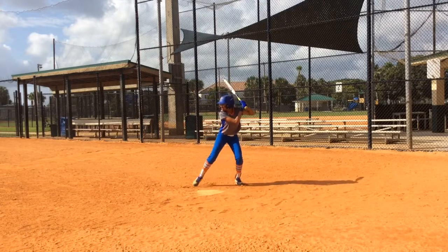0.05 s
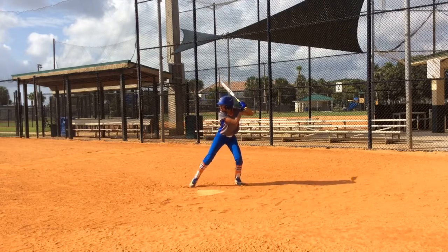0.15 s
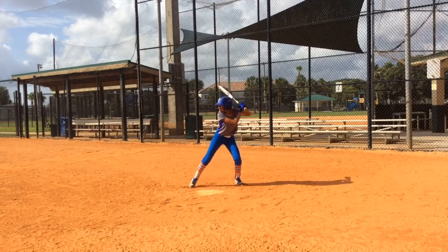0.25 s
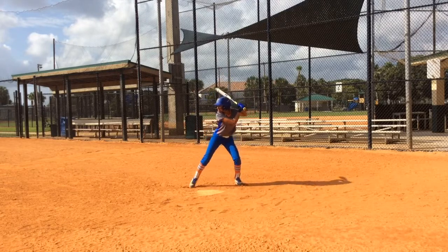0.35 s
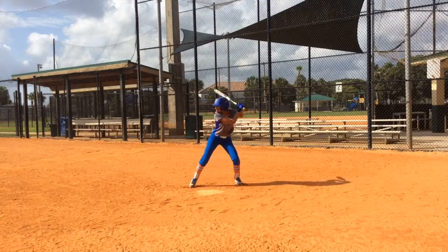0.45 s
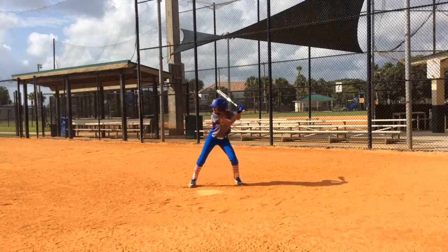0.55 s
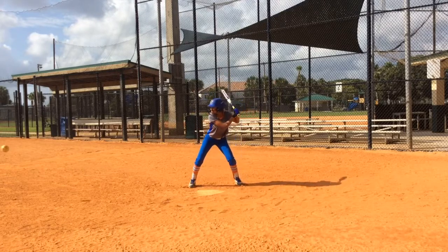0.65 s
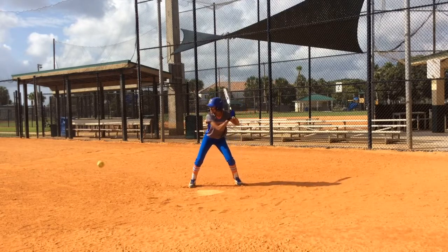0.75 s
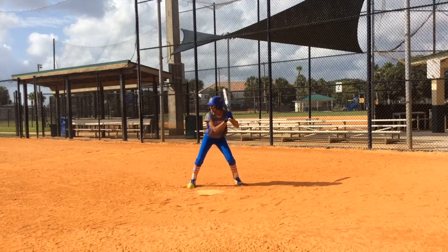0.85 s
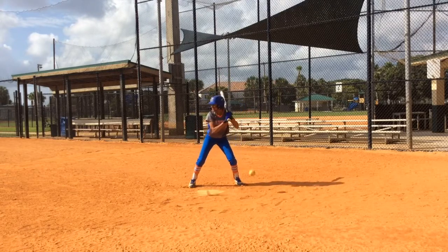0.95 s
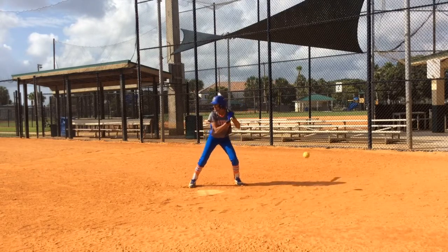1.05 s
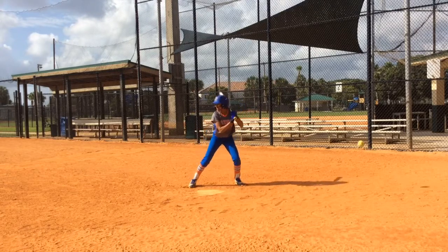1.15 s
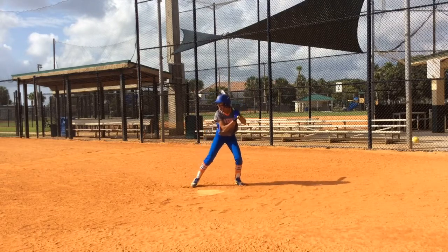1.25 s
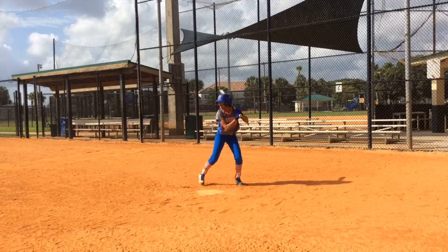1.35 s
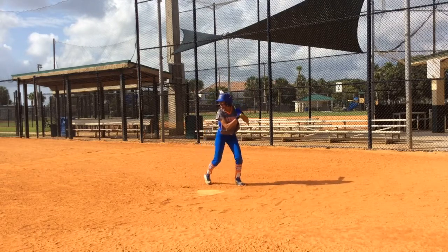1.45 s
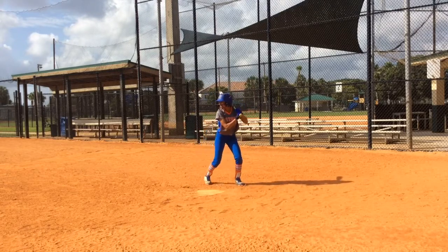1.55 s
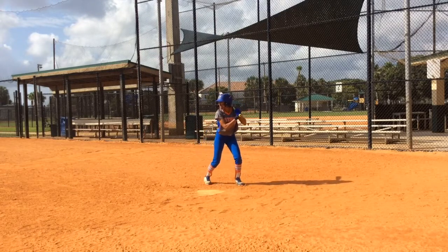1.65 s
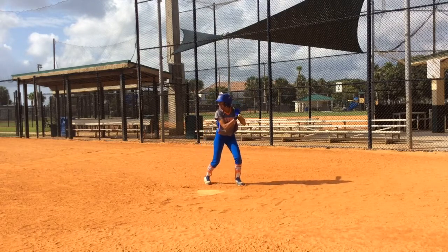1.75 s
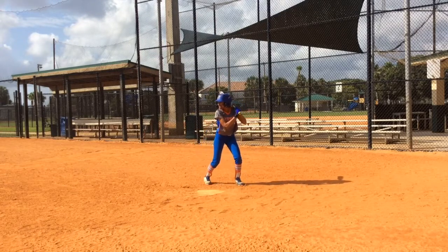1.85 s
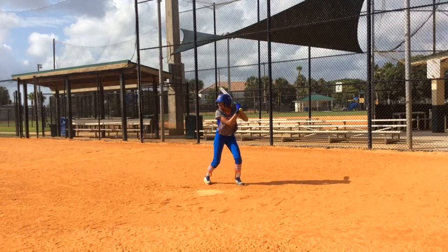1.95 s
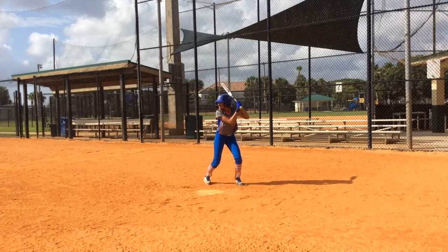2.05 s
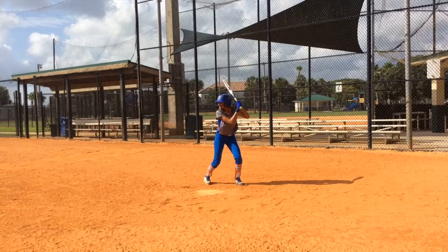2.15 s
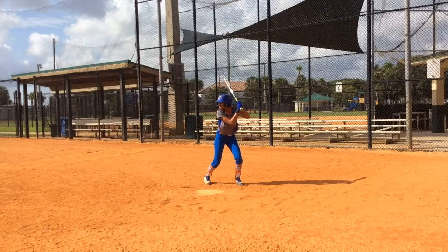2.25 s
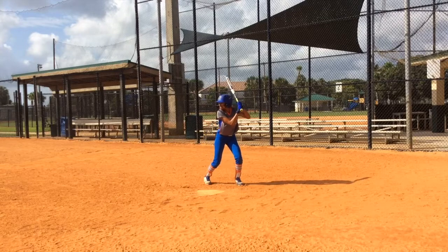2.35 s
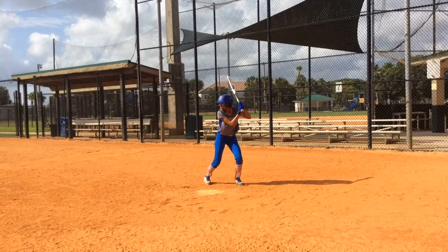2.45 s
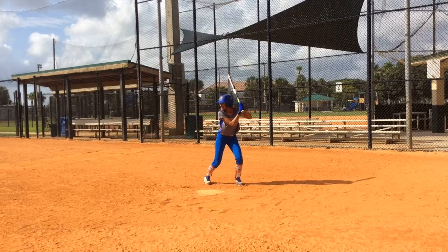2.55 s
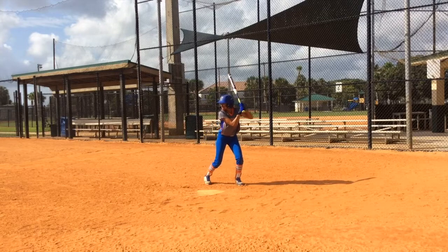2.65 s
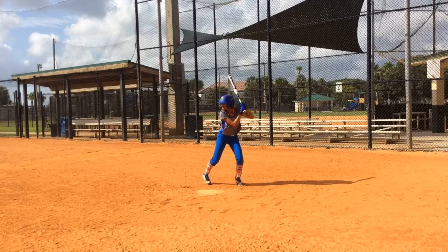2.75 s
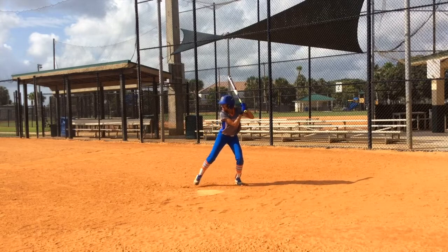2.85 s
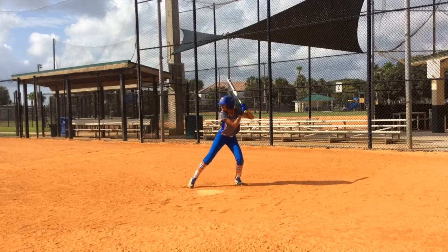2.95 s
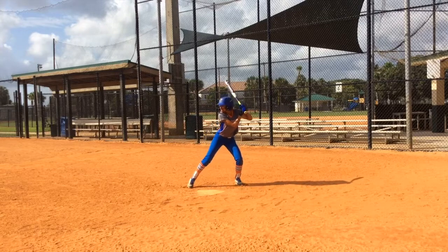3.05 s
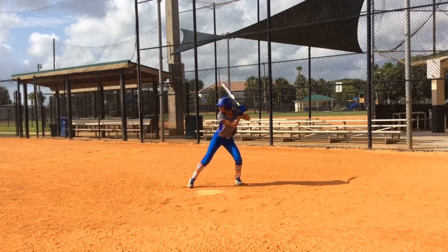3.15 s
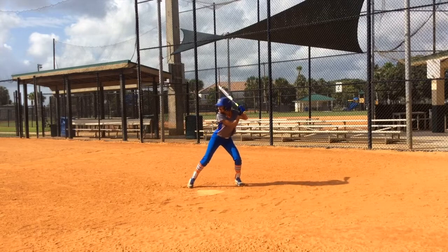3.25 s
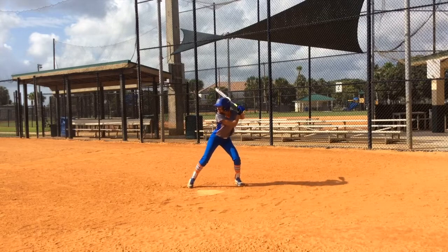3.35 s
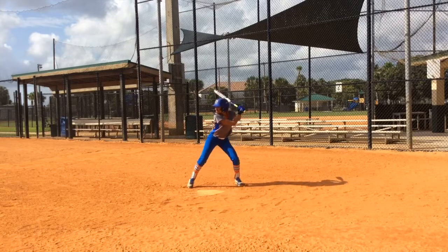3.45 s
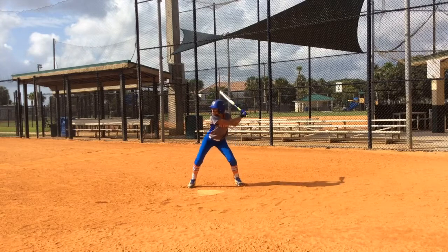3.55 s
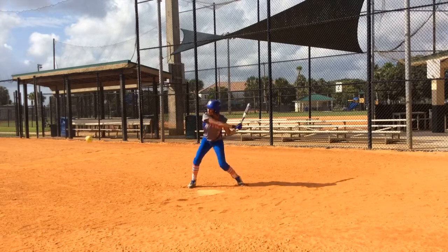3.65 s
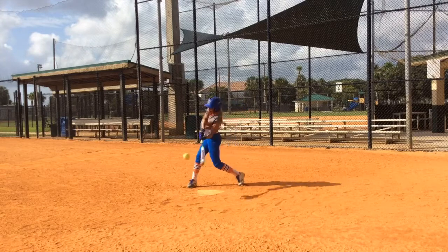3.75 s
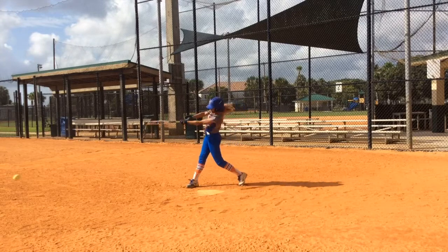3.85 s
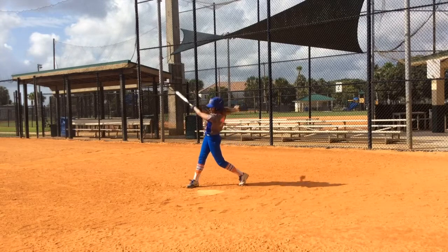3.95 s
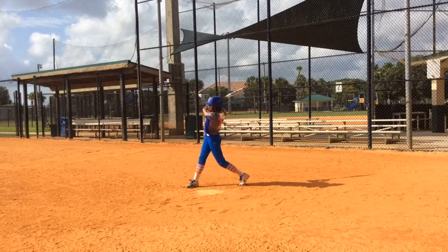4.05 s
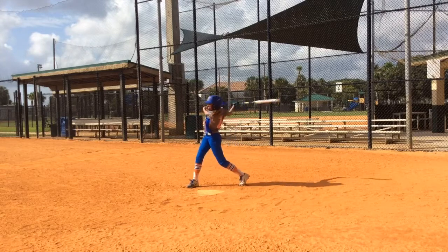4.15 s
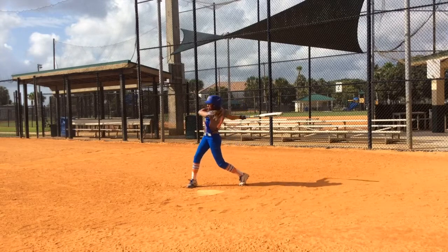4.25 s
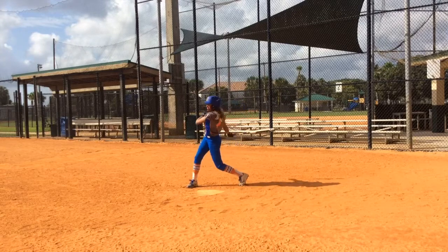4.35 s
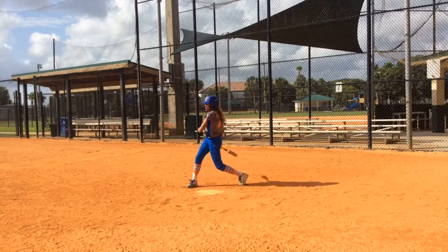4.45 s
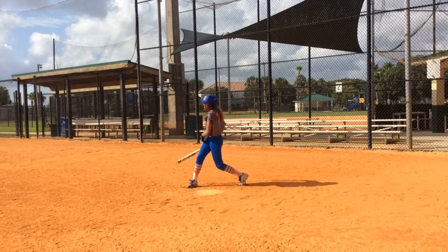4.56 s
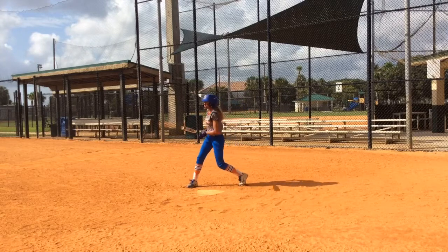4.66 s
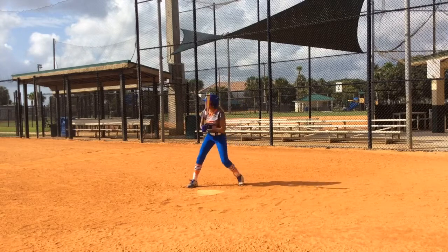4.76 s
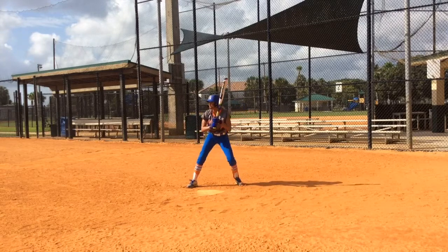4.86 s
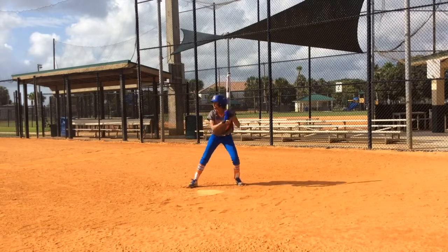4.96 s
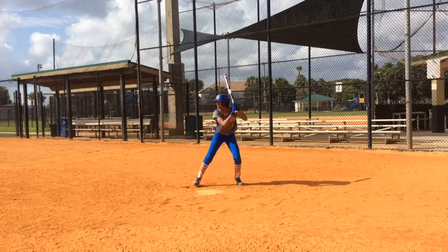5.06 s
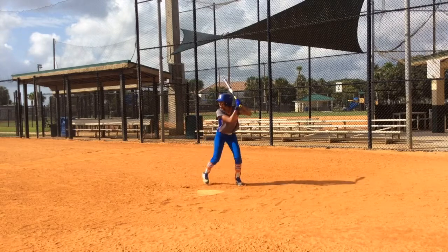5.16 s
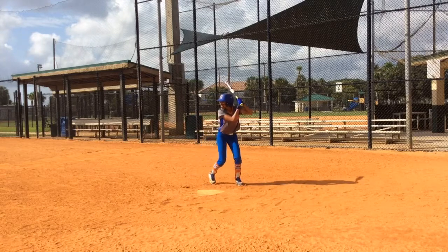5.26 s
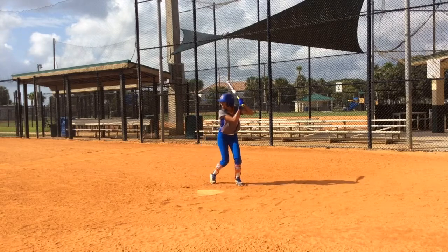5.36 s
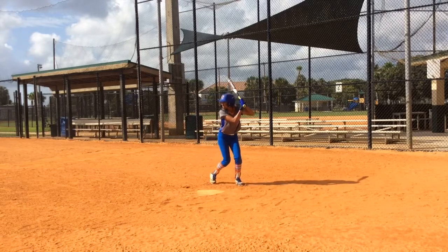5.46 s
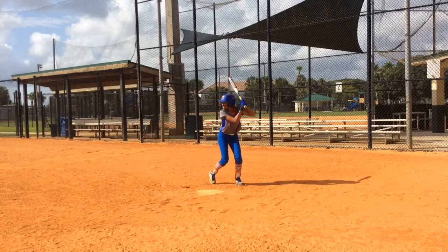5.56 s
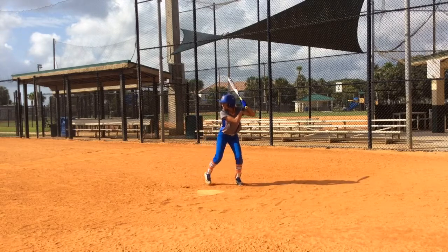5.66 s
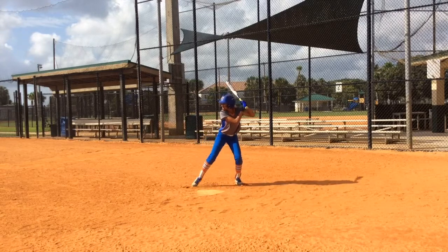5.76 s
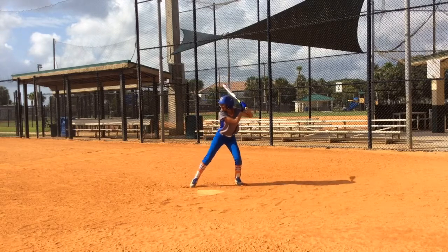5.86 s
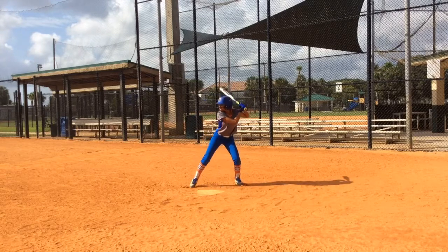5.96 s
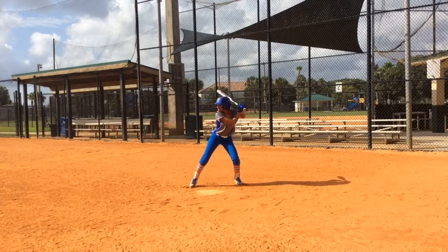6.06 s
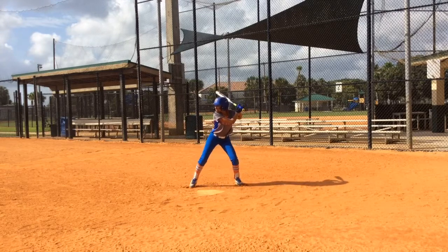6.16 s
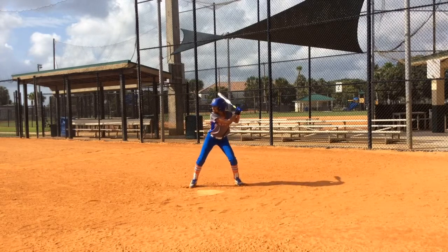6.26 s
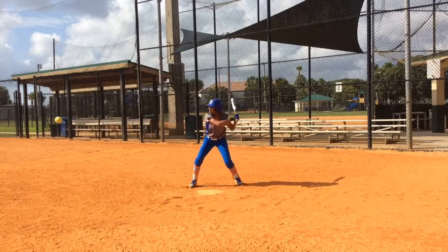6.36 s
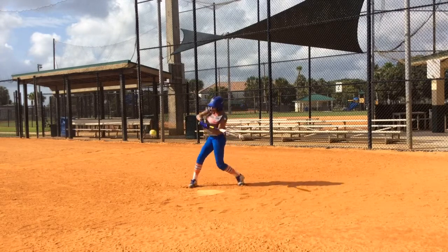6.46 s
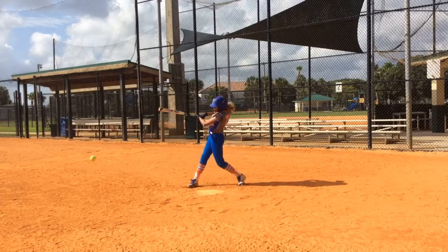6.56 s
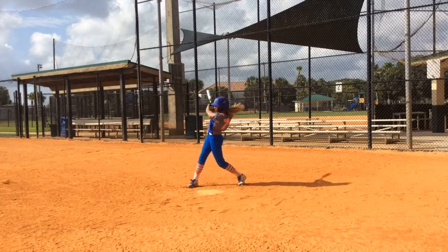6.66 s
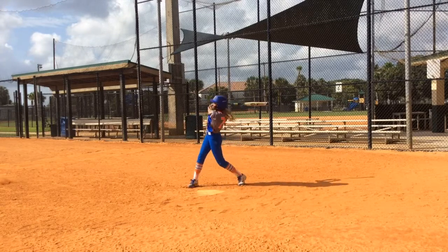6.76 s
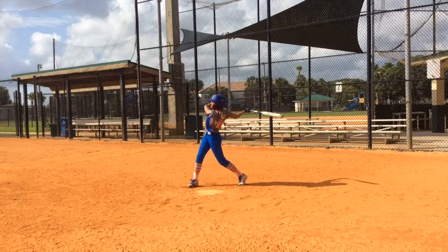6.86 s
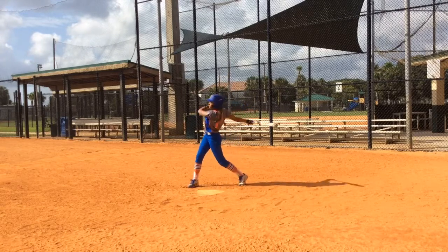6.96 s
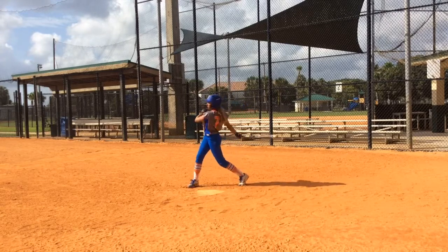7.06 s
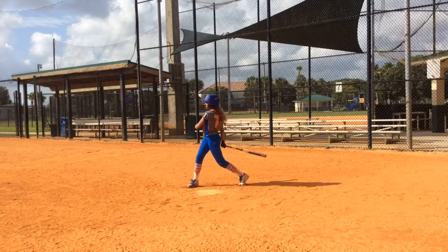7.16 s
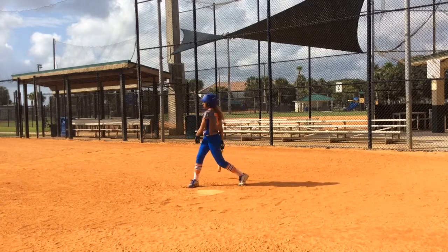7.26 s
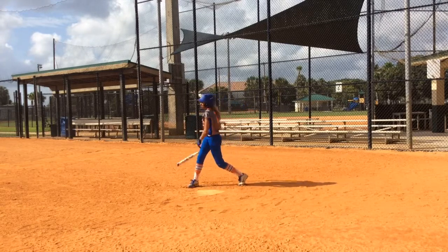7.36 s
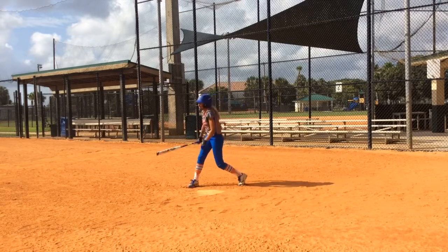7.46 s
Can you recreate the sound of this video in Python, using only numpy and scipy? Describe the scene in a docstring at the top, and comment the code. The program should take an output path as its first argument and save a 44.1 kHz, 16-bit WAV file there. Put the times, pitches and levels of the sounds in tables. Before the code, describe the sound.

Over quiet open air, a ball bounces in dirt and slaps the backstop, followed by two loud metallic bat hits with clattering echoes and landing thuds.

```python
"""A hollow bat hits two balls on a dirt softball field: click, dying modes and a pop, echoed by dugouts,
fences and a diffuse field. Balls land with a thud and grit; one pitch bounces past into the backstop.
Filtered noise makes the swings, cleat scuffs, open air and insects; wavering sines make a far engine,
traffic drone and cricket. One microphone, alike in both ears."""
import sys
import numpy as np
from scipy import signal
from scipy.fft import rfft, irfft
from scipy.io import wavfile

SR = 44100
rng = np.random.default_rng(int(sys.argv[2]) if len(sys.argv) > 2 else 0)


def digitize_waveform(pressure):
    """Quantize a signal to 16-bit integers and store it at the path in sys.argv[1].

    Rows of a 2-D input are taken as channels; values are limited to [-1, 1].
    """
    field = np.atleast_2d(pressure).T
    bounded = np.clip(field, -1, 1)
    quanta = np.round(bounded * 32767).astype(np.int16)
    wavfile.write(sys.argv[1], SR, quanta)


N = 331568
T = np.arange(N) / SR
RING_T = np.arange(SR) / SR

# Open-air noise spectrum: (frequency [Hz], relative level [dB])
AIR_SPECTRUM = [(15, -36), (25, -15), (77, -3), (135, -3.5), (167, -7.5), (224, -8.5), (301, -18),
                (394, -18), (529, -28), (952, -25.5), (1720, -36), (4040, -47), (5420, -49.5),
                (8550, -45.5), (15000, -58)]
# High hiss of insects: (centre [Hz], half-width [Hz], level [dB])
INSECT_BAND = (8800, 770, -94.5)
# Far engine: (time [s], pitch [Hz], level [dB])
ENGINE_TRACK = [(0, 110, -73.5), (.72, 112, -62.5), (1.1, 124, -68.5), (1.7, 135.4, -63),
                (3.1, 154.2, -74.5), (4.4, 132.8, -71.5), (5.4, 138.1, -70), (6.5, 143.1, -63),
                (7.5, 147.1, -56.5)]
# Deeper traffic drone: (time [s], pitch [Hz], level [dB])
DRONE_TRACK = [(0, 76.1, -78), (1.2, 79.1, -66), (3.2, 92.44, -74.5), (4.9, 84.2, -75.5),
               (5.9, 88.2, -66.5), (7.5, 90, -65)]

# Cleat scuffs: (time [s], energy [dB], length [s], pitch [Hz])
SCUFF_EVENTS = [(4.981, -50.5, 0.073, 1760), (5.114, -41, .11, 540), (5.42, -44.5, 0.25, 2360),
                (6.011, -42.5, 0.065, 980), (7.4, -51, 0.035, 1505)]
# Dirt spectrum: (multiple of the scuff pitch, level [dB])
DIRT_SPECTRUM = [(.15, -27), (.6, 7.5), (1, 5.5), (1.5, -0.5), (3, -6.5), (6, -17), (11, -18), (16, -38)]
# Bat through the air: (time of the peak [s], half-length to 1/e [s], pitch [Hz], peak level [dB])
SWING_EVENTS = [(3.663, 0.25, 409, -72.5), (6.582, 0.053, 450, -80.5)]
# Whoosh spectrum: (multiple of the swing pitch, level [dB])
WHOOSH_SPECTRUM = [(.3, -34), (.8, -17), (1, 4.5), (1.2, -13), (1.42, -13), (1.62, -4.5), (1.9, -27),
                   (6, -42.5)]

# Ball into the backstop: (time [s], energy [dB])
BACKSTOP_HIT = (1.8834, -9.5)
# Slap on the backstop: (frequency [Hz], level [dB])
SLAP_SPECTRUM = [(20, -18), (45, 9), (80, 1), (200, 17.5), (290, -0.5), (600, 2.5), (1100, -2), (2000, -12),
                 (2900, -22), (4600, -12), (6000, -27), (8000, -34), (15000, -40)]
# Backstop modes: (frequency [Hz], level [dB], t60 [s])
BACKSTOP_MODES = [(85, -1.5, 0.15), (113.4, -5, 0.18), (199.6, -6, 0.091)]
# Rebound and echoes of the backstop: (frequency [Hz], level [dB])
BACKSTOP_TAIL_SPECTRUM = [(25, -14), (60, -8.5), (115, 9), (220, 4), (450, -8.5), (800, -7), (1500, -9),
                          (2300, -20.5), (4000, -28), (6000, -55), (15000, -74)]

# Ball on dirt: (time [s], thud energy [dB], thud pitch [Hz], grit re thud [dB], echo re thud [dB])
BOUNCE_EVENTS = [(1.0413, -14.7, 283.7, -21.5, -6.5), (1.7690, -26, 306, -30.5, -19),
                 (1.7750, -28.5, 276, -35, -14), (2.4698, -30, 374, -27, -11), (2.771, -44, 403, -20, -13),
                 (4.0872, -24, 385.7, -11, -10.5), (4.710, -38.5, 440, -17, -12),
                 (6.174, -50.5, 440, -7, -10), (6.8065, -20, 337.6, -12, -8)]
# Thud: (multiple of the thud pitch, level [dB])
THUD_SPECTRUM = [(.1, -31), (.4, 0), (1, 0.5), (1.5, -4), (2.1, -13), (3.1, -9.5), (5.5, -33.5), (12, -45),
                 (30, -75)]
# Grit: (multiple of the grit pitch, level [dB])
GRIT_SPECTRUM = [(.1, -41), (.65, -3), (1, 7.5), (1.25, 4), (1.7, -21), (4, -62)]
# Hard cover of the ball: (frequency [Hz], level [dB])
COVER_SPECTRUM = [(200, -18), (500, -6.5), (660, -5), (780, -9), (900, -0.5), (1100, -6.5), (1300, -9),
                  (1700, -29), (4000, -56), (15000, -80)]
# Colour of the answer to a bounce: (frequency [Hz], level [dB])
WALL_SPECTRUM = [(100, -2.5), (1200, 1), (2500, -3.5), (6000, -11), (15000, -27)]

# Dugouts, posts and fences round the plate; each favours one bat mode: (delay [s], level [dB],
# smear [s], tilt [dB per octave], favoured mode [Hz], share of that mode [dB])
WALL_ECHOES = [(.0042, -7, .005, 3.5, 849, -5), (0.0159, -9, .012, -1, 4334, -7.5),
               (0.0265, -0.5, .0036, -.5, 3284, -12), (0.0415, -9, .006, -2, 1162, 2.5),
               (0.0594, -7.5, .009, 0, 1278, -2), (.0741, -6.5, 0.0025, 0.8, 4340, -10),
               (0.0897, -15.5, .0042, 2.5, 4300, 4), (.106, -24, .002, -2, 2840, -14)]
# Diffuse decay of the field: (frequency [Hz], t60 [s])
FIELD_T60 = [(100, 0.67), (400, 0.32), (1100, 0.41), (2500, 0.39), (4400, 0.4), (8000, 0.4), (15000, 0.31)]
# Return of the outfield fence and the trees behind it: (frequency [Hz], level [dB])
OUTFIELD_SPECTRUM = [(500, -30), (1200, 9), (1700, -7.5), (2350, 7), (3300, 2), (3900, -4), (4350, 2),
                     (4550, 10), (4850, -6.5), (8000, -8.5), (12000, -15), (15000, -37)]

# Blows of the bat: (time [s], crack energy [dB], barrel pop energy [dB], pop pitch [Hz],
# thock energy [dB], thock pitch [Hz], diffuse tail energy [dB], echo level [dB],
# echo brightness [dB per octave])
BAT_HITS = [(3.9236, -10, -8, 1108, -15.5, 440, -6, -5.5, -0.9),
            (6.6534, -7, -6.5, 1047, -14.5, 318.6, -5, -2.5, 1.3)]
# Crack of contact: (frequency [Hz], level [dB])
CRACK_SPECTRUM = [(25, -25), (70, -9.5), (150, -4), (400, 8.5), (650, 3.5), (1200, 1), (1750, -11.5),
                  (2400, 5), (4600, 4), (5600, -5.5), (8000, -5), (15000, -11)]
# Bat modes: (frequency [Hz], level in first blow [dB], level in second blow [dB], t60 [s])
BAT_MODES = [(1129, 4.5, -8.5, 0.19), (1281, -5.5, -0.5, 0.25), (1520, -19, -14.5, .06),
             (2034, -14, -7.5, .07), (2100, -16, -12.5, .06), (2260, -23, -10, 0.045),
             (2636, -18, -25, 0.044), (2880, -12, -9.5, 0.091), (3288, -12, -8, 0.12),
             (4350, -14, -5.5, 0.13), (4900, -25, -34, .05), (6090, -26.5, -22.5, .06),
             (6150, -32, -19, .06), (6930, -25, -24, .05)]
# Crack as the barrel throws it sideways: (frequency [Hz], level [dB])
THROWN_SPECTRUM = [(60, -32), (400, -15.5), (620, -3.5), (820, -6), (1130, 15), (1430, 2.5), (2000, 3),
                   (2450, -1), (2950, 3), (3800, -5), (5500, -7.5), (8000, -11.5), (10000, -10.5),
                   (15000, -18)]

AIR_DB = -65.3
CRICKET_HZ, CRICKET_DB, CRICKET_SWELL_DB = 3933, -101.5, 2.6

REBOUND_S, REBOUND_DB = 0.015, -24  # the covering slaps back
# the walls' answer to the backstop, which stands a little further from them
BACKSTOP_WALL_DB, BACKSTOP_LAG_S, BACKSTOP_SMEAR_S = -14.5, 0.0028, 0.0029

HARD_LANDING_DB = -23  # thud energy below which it dulls
HARDNESS_DB_PER_OCT, SOFTENING_DB_PER_OCT_PER_DB = -2, 0.9  # thud tilt; its loss per dB of energy
GRIT_RATIO = 9.5  # grit pitch over thud pitch
BOUNCE_WALL_DB, BOUNCE_LEAD_S = -3.5, 0.0012  # a bounce lands a little nearer to the walls
BOUNCE_NEAR_S, BOUNCE_NEAR_DB = 0.0065, 1  # return from close by
BOUNCE_SMEAR_S = 0.0025
WALL_MIRROR_DB = -4.5  # mirror-like share of a wall's return of a thud

BEAM_T60_S, ECHO_RING_DB = 0.063, -7  # ring of the favoured mode; share of the whole barrel
HOOP_HZ, HOOP_DB, HOOP_DECAY_S = 4347, -34.5, 0.13  # high hoop mode lingering among far buildings
OUTFIELD_DELAY_S = 0.362  # to the outfield fence and back

LOW_CUT_HZ, EDGE_HZ = 42, 15400  # microphone's bass roll-off; recorder's band limit


def gain_of(db):
    """Decibels to amplitude."""
    return 10 ** (np.asarray(db) / 20)


def unit(x):
    """Scales to energy 1."""
    return x / np.sqrt(np.sum(x ** 2) + 1e-30)


def evened(x):
    """Scales to rms 1."""
    return unit(x) * np.sqrt(x.size)


def read(points, hz):
    """Joins the points of a spectrum on a log-frequency axis."""
    point_hz, value = np.transpose(points)
    return np.interp(np.log(hz + 1e-6), np.log(point_hz), value)


def add(mix, start_s, sound):
    """Mixes a sound in at start_s."""
    part = mix[round(start_s * SR):][:len(sound)]
    part += sound[:len(part)]


def bins(x):
    """Frequencies of the spectrum of x [Hz]."""
    return np.fft.rfftfreq(len(x), 1 / SR)


def click(points, tilt_db=0, scale=1, knee_hz=1000):
    """Minimum-phase pulse of energy 1 with this spectrum, tilted in dB per octave above the knee."""
    hz = bins(RING_T)
    octaves = np.log2(np.maximum(hz / knee_hz, 1))
    db = read(points, hz / scale) + tilt_db * octaves
    cepstrum = irfft(np.log(gain_of(db)), SR)
    # folding the cepstrum onto positive time makes the pulse causal
    folded = 2 * cepstrum * (RING_T < 0.5) * (RING_T > 0)
    return unit(irfft(np.exp(rfft(folded)), SR))


def through(x, response):
    """Convolution that keeps the length of x."""
    return signal.fftconvolve(x, response)[:len(x)]


def ring(modes):
    """Dying sines of joint energy 1 from rows (frequency [Hz], level [dB], t60 [s])."""
    total = np.zeros(SR)
    for hz, db, t60_s in modes:
        decay = np.exp(-np.log(1000) * RING_T / t60_s)
        total += gain_of(db) * decay * np.sin(2 * np.pi * hz * RING_T)
    return unit(total)


def scatter(decay_s):
    """Cluster of small reflections: noise decaying by 1/e in decay_s."""
    return unit(rng.standard_normal(SR) * np.exp(-RING_T / decay_s))


def shaped_noise(gain):
    """Noise of rms 1 with this amplitude spectrum."""
    return evened(irfft(rfft(rng.standard_normal(N)) * gain, N))


def wander(rate_hz):
    """Slow random curve of rms 1."""
    return shaped_noise(1 / (1 + (bins(T) / rate_hz) ** 2))


def air():
    """Breeze and traffic as a noise wash, plus a high insect band; both levels drift."""
    hz = bins(T)
    wash = shaped_noise(gain_of(read(AIR_SPECTRUM, hz)))
    centre_hz, width_hz, insect_db = INSECT_BAND
    insects = shaped_noise(1 / (1 + ((hz - centre_hz) / width_hz) ** 2))
    wash_gain = gain_of(AIR_DB + 1.5 * wander(1.5))
    return wash * wash_gain + insects * gain_of(insect_db + 0.6 * wander(0.99))


def hum(track, waver, flutter_db):
    """Far sine that wavers in pitch and level on its way through the air."""
    time_s, hz, db = np.transpose(track)
    pitch_hz = np.interp(T, time_s, hz) * (1 + waver * wander(6))
    turns = np.cumsum(pitch_hz) / SR
    level_db = np.interp(T, time_s, db) + flutter_db * wander(16)
    return gain_of(level_db) * evened(np.sin(2 * np.pi * turns))


def engine():
    """Far engine: one tone that speeds up, eases off and draws nearer."""
    return hum(ENGINE_TRACK, waver=0.008, flutter_db=1.77)


def drone():
    """Deeper traffic: one wavering low tone."""
    return hum(DRONE_TRACK, waver=0.015, flutter_db=2.0)


def cricket():
    """Far cricket: one thin tone that slowly swells and fades."""
    tone = hum([(0, CRICKET_HZ, CRICKET_DB)], waver=0.0033, flutter_db=2.0)
    return tone * gain_of(CRICKET_SWELL_DB * wander(0.47))


def scuffs():
    """Grains of dirt of uneven size slide under a shoe: noise under a half-sine stroke."""
    out = np.zeros(N)
    for start_s, db, length_s, hz in SCUFF_EVENTS:
        grains = rng.standard_normal(SR) * gain_of(1.8 * rng.standard_normal(SR))
        stroke = np.sin(np.pi * np.minimum(RING_T / length_s, 1))
        scuff = through(grains * stroke, click(DIRT_SPECTRUM, scale=hz))
        add(out, start_s, gain_of(db) * unit(scuff))
    return out


def swings():
    """Eddies shed by the barrel: pitched noise swelling and fading about the fastest moment."""
    out = np.zeros(N)
    for peak_s, length_s, hz, db in SWING_EVENTS:
        eddies = evened(through(rng.standard_normal(N), click(WHOOSH_SPECTRUM, scale=hz)))
        out += eddies * gain_of(db) * np.exp(-((T - peak_s) / length_s) ** 2)
    return out


def field(delay_s, rise_s):
    """Diffuse return of fences and stands: swells after a delay, decays at a t60 set by frequency."""
    hz, frame_s, frames = signal.stft(rng.standard_normal(SR), SR, nperseg=256)
    decay = np.exp(-np.log(1000) * frame_s / read(FIELD_T60, hz)[:, None])
    tail = signal.istft(frames * decay, SR, nperseg=256)[1][:SR]
    return unit(tail * np.clip((RING_T - delay_s) / rise_s, 0, 1))


def walls(lag_s, smear_s):
    """Walls' return of a thud: from each a mirror image and a cluster of small reflections."""
    out = np.zeros(SR)
    for delay_s, db, *_ in WALL_ECHOES:
        mirror = gain_of(WALL_MIRROR_DB) * (RING_T == 0)
        add(out, max(delay_s + lag_s, 0), gain_of(db) * (scatter(smear_s) + mirror))
    return out


def outfield(barrel, rise_s, decay_s):
    """A long fence answers bit by bit, so its echo swells and fades."""
    envelope = (1 - np.exp(-RING_T / rise_s)) * np.exp(-RING_T / decay_s)
    spread = rng.standard_normal(SR) * envelope
    return unit(through(spread, click(OUTFIELD_SPECTRUM) + gain_of(-8.0) * barrel))


def backstop():
    """Ball on the backstop: a slap, a flapping covering, a low modal boom and dull echoes."""
    out = np.zeros(N)
    hit_s, db = BACKSTOP_HIT
    tail = click(BACKSTOP_TAIL_SPECTRUM)
    add(out, hit_s, -gain_of(db) * click(SLAP_SPECTRUM))
    flap = unit(through(click(SLAP_SPECTRUM, tilt_db=3.1), scatter(0.004)))
    add(out, hit_s, gain_of(db - 7.5) * flap)
    rebound = unit(through(tail, scatter(0.0015)))
    add(out, hit_s + REBOUND_S, gain_of(REBOUND_DB) * rebound)
    add(out, hit_s, gain_of(-8.5) * ring(BACKSTOP_MODES))
    add(out, hit_s, gain_of(-14.0) * unit(through(tail, field(0.002, 0.02))))
    duller = click(BACKSTOP_TAIL_SPECTRUM, tilt_db=-0.3)
    echo = unit(through(duller, walls(BACKSTOP_LAG_S, BACKSTOP_SMEAR_S)))
    add(out, hit_s, gain_of(BACKSTOP_WALL_DB) * echo)
    return out


def bounces():
    """The ball lands with a dull push and a spit of grit, the softer the duller; walls and field answer."""
    out = np.zeros(N)
    around = gain_of(BOUNCE_WALL_DB) * walls(-BOUNCE_LEAD_S, BOUNCE_SMEAR_S)
    around += gain_of(-5) * field(0.0023, 0.0032)
    add(around, BOUNCE_NEAR_S, gain_of(BOUNCE_NEAR_DB) * scatter(0.0027))
    colour, cover = click(WALL_SPECTRUM), click(COVER_SPECTRUM)
    for start_s, db, hz, grit_db, echo_db in BOUNCE_EVENTS:
        softness_db = max(HARD_LANDING_DB - db, 0)
        tilt_db = HARDNESS_DB_PER_OCT - SOFTENING_DB_PER_OCT_PER_DB * softness_db
        grit = unit(through(click(GRIT_SPECTRUM, scale=GRIT_RATIO * hz), scatter(0.002)))
        push = click(THUD_SPECTRUM, tilt_db, hz, knee_hz=1.2 * hz)
        crush = unit(through(push, scatter(0.0021)))  # the soil gives way
        shell = gain_of(-9.5 + 1.28 * tilt_db) * cover  # weaker in a soft landing
        body = unit(push + gain_of(-11) * crush)
        thud = gain_of(db) * (body + shell + gain_of(grit_db) * grit)
        add(out, start_s, thud)
        echo = unit(through(through(thud, colour), around))
        add(out, start_s, gain_of(db + echo_db) * echo)
    return out


def bat_contact(crack_db, pop_db, pop_hz, thock_db, thock_hz):
    """Direct sound of a blow: crack, short barrel pop and the ball's thock."""
    splinter = unit(through(click(CRACK_SPECTRUM, tilt_db=0.3), scatter(0.0038)))
    crack = unit(click(CRACK_SPECTRUM) + gain_of(3.5) * splinter)
    pop = ring([(pop_hz, 0, 0.032)])
    thock = ring([(thock_hz, 0, 0.015)])
    return gain_of(crack_db) * crack + gain_of(pop_db) * pop + gain_of(thock_db) * thock


def bat():
    """Each blow arrives direct; the ringing barrel is heard by way of the surroundings."""
    out = np.zeros(N)
    for blow, (hit_s, *contact, tail_db, echo_db, bright_db) in enumerate(BAT_HITS):
        add(out, hit_s, bat_contact(*contact))
        barrel = ring([(row[0], row[1 + blow], row[-1]) for row in BAT_MODES])
        voice = unit(click(THROWN_SPECTRUM) + gain_of(-2.5) * barrel)
        add(out, hit_s, gain_of(tail_db) * unit(through(voice, field(0.0016, 0.05))))
        # trees and buildings further off keep the ring alive
        far = gain_of(-5.5) * barrel + click(THROWN_SPECTRUM, tilt_db=-2)
        add(out, hit_s, gain_of(tail_db - 22.5) * unit(through(far, scatter(0.28))))
        hoop = unit(through(ring([(HOOP_HZ, 0, 0.045)]), scatter(HOOP_DECAY_S)))
        add(out, hit_s, gain_of(HOOP_DB) * hoop)
        fence = outfield(barrel, rise_s=0.032, decay_s=0.073)
        add(out, hit_s + OUTFIELD_DELAY_S, gain_of(tail_db - 28) * fence)
        for delay_s, wall_db, smear_s, tilt_db, mode_hz, mode_db in WALL_ECHOES:
            face = unit(through(click(THROWN_SPECTRUM, tilt_db + bright_db), scatter(smear_s)))
            beam = gain_of(mode_db) * ring([(mode_hz, 0, BEAM_T60_S)])
            echo = unit(face + beam + gain_of(ECHO_RING_DB) * barrel)
            add(out, hit_s + delay_s, gain_of(echo_db + wall_db) * echo)
    return out


def scene():
    """All sources at one microphone, heard alike in both ears."""
    background = air() + engine() + drone() + cricket()
    play = scuffs() + swings() + backstop() + bounces() + bat()
    mono = background + play
    return np.array([mono, mono])


def record(dry):
    """The microphone's bass roll-off and the recorder's band limit."""
    low_cut = signal.butter(2, LOW_CUT_HZ, "highpass", fs=SR, output="sos")
    band_limit = signal.firwin(301, EDGE_HZ, window=("kaiser", 8), fs=SR)
    return signal.oaconvolve(signal.sosfilt(low_cut, dry), band_limit[None], "same")


dry = scene()
out = record(dry)
digitize_waveform(out)
```